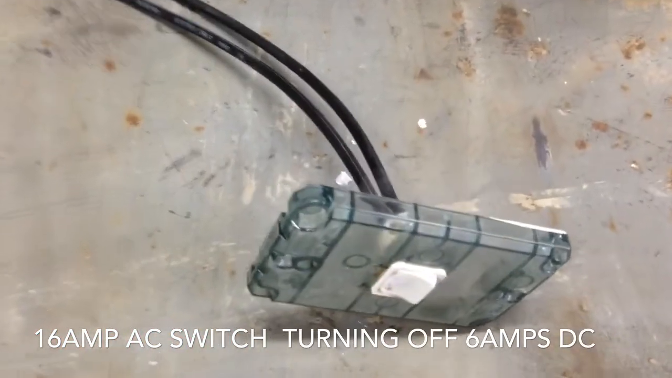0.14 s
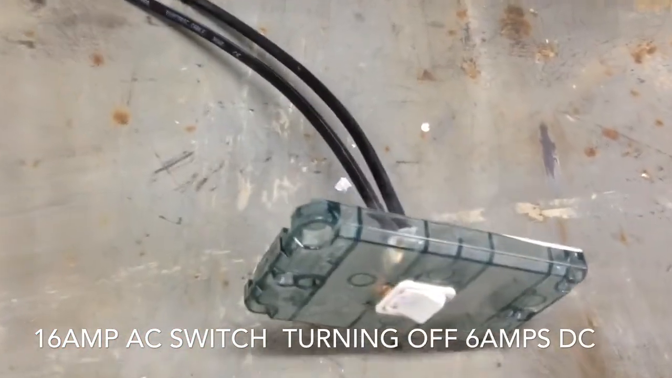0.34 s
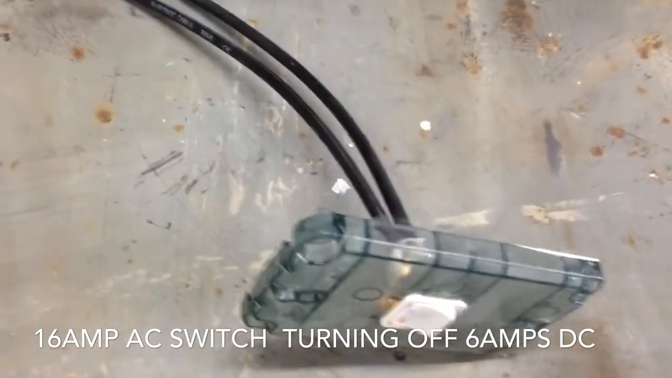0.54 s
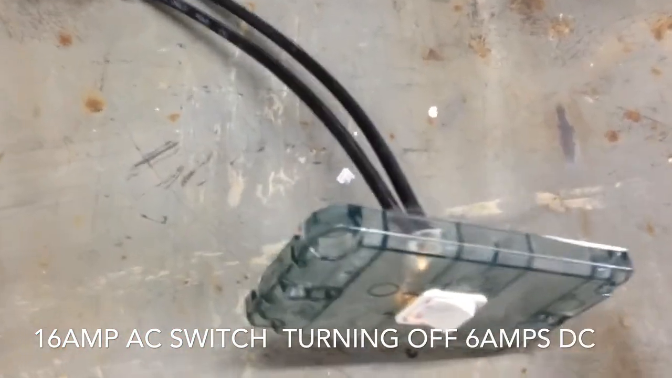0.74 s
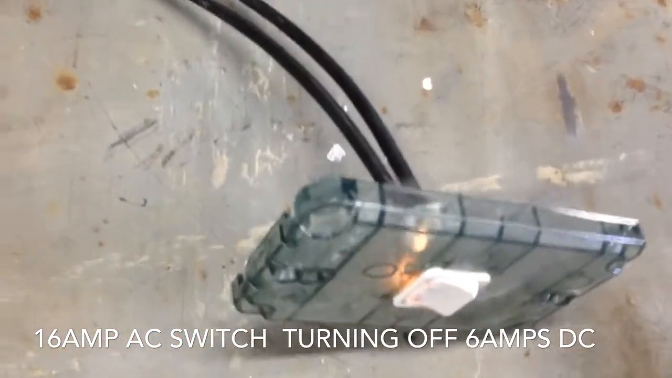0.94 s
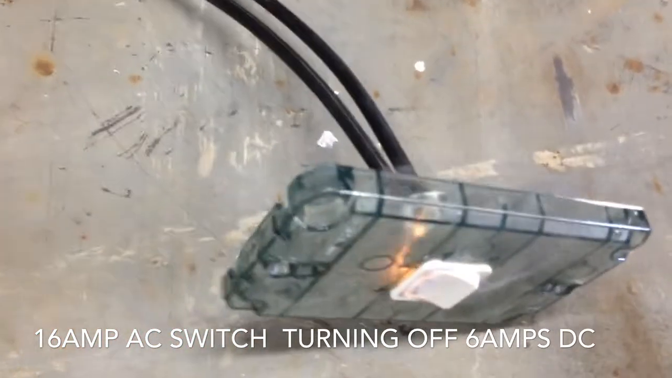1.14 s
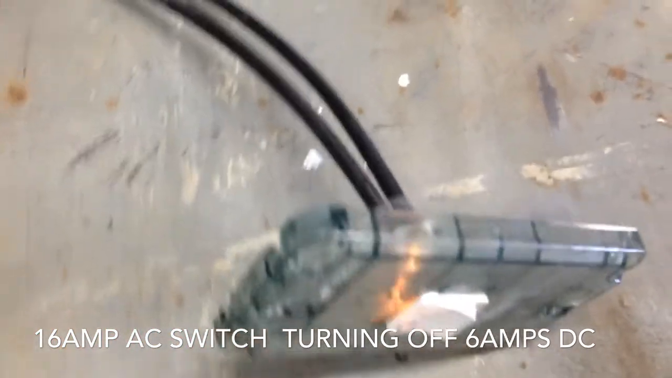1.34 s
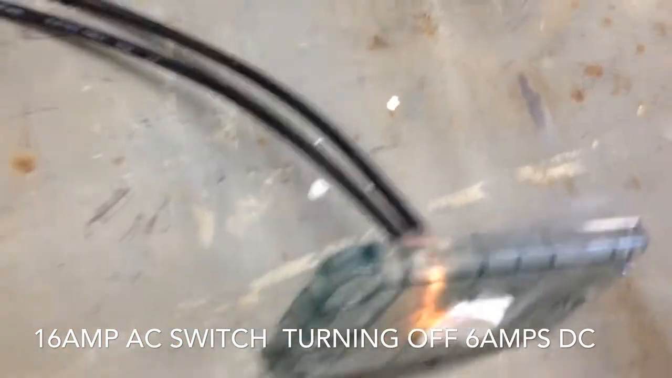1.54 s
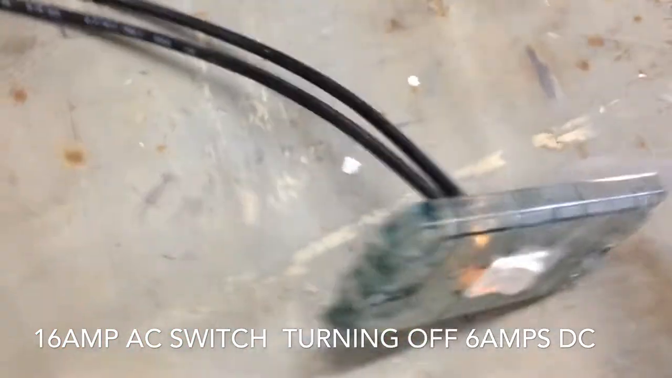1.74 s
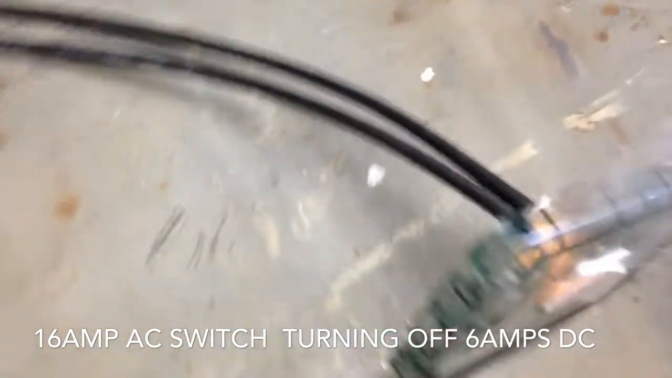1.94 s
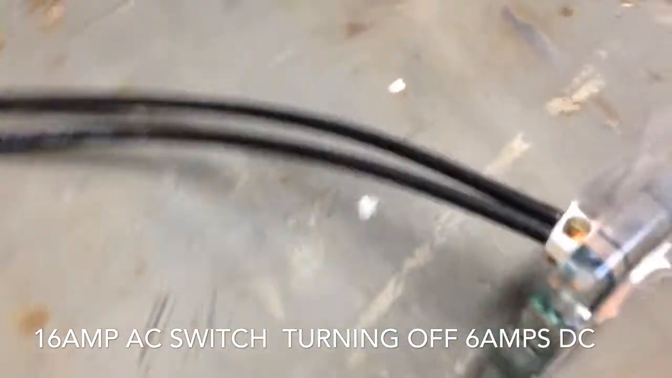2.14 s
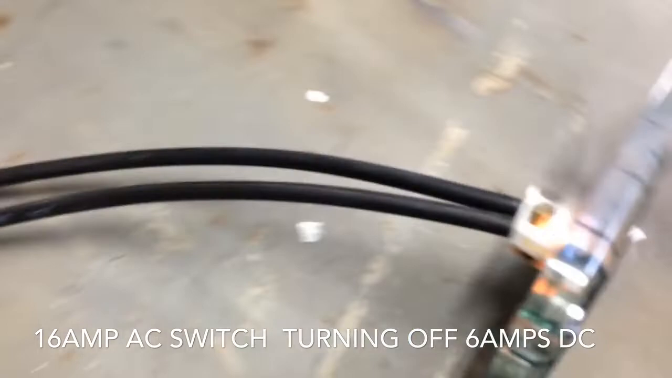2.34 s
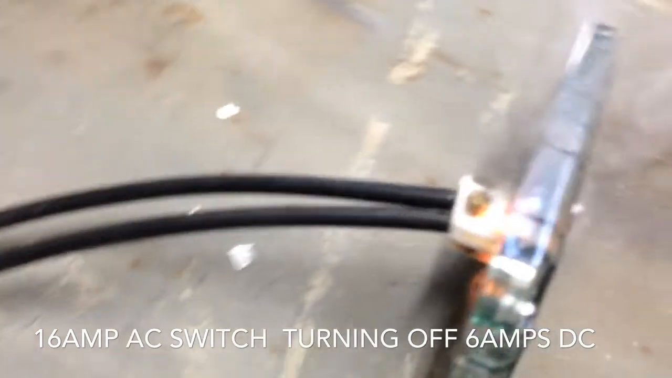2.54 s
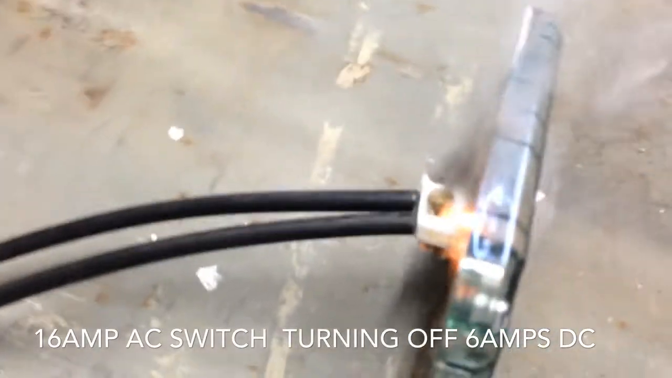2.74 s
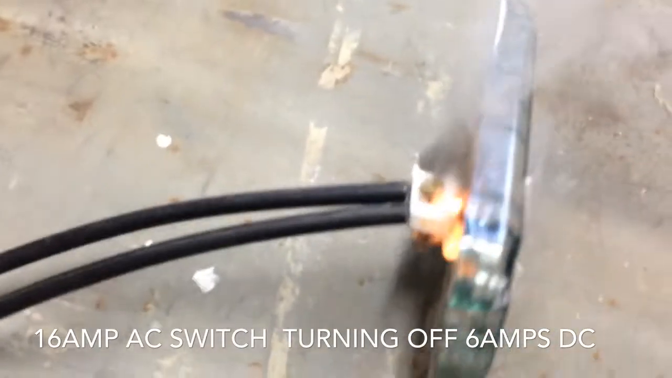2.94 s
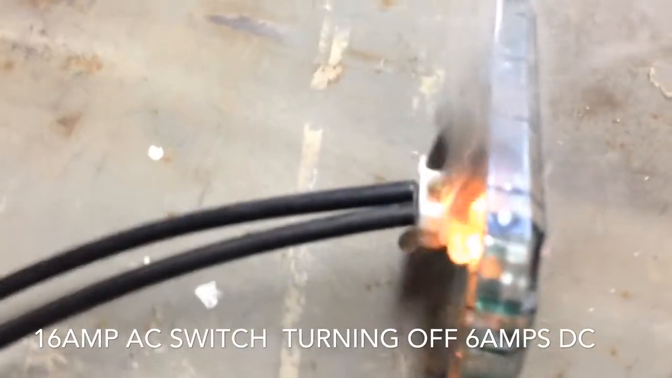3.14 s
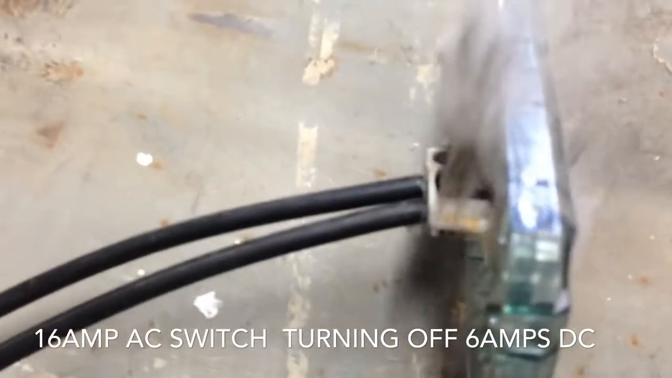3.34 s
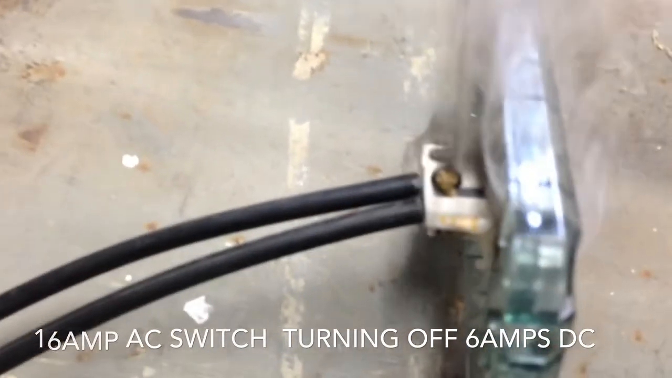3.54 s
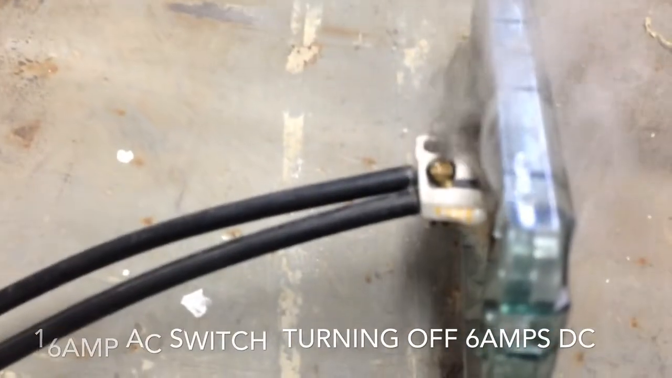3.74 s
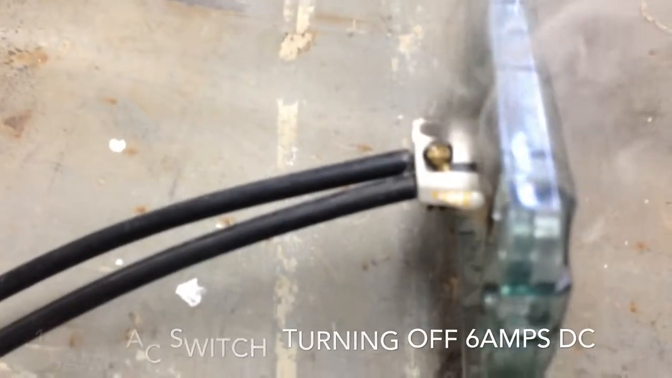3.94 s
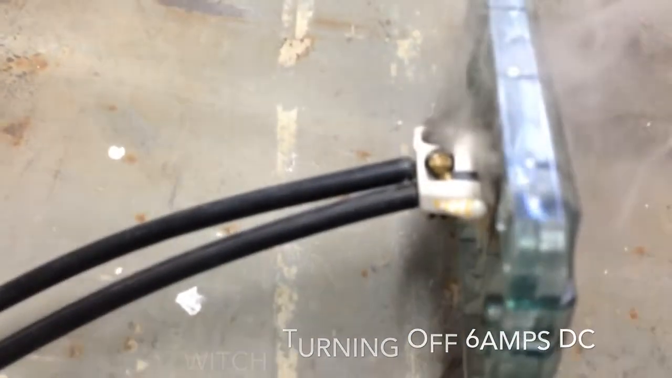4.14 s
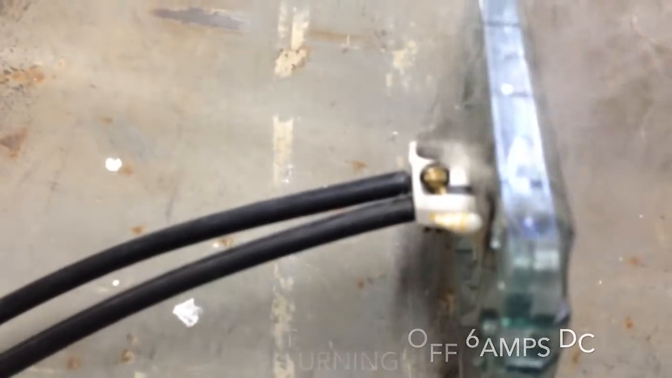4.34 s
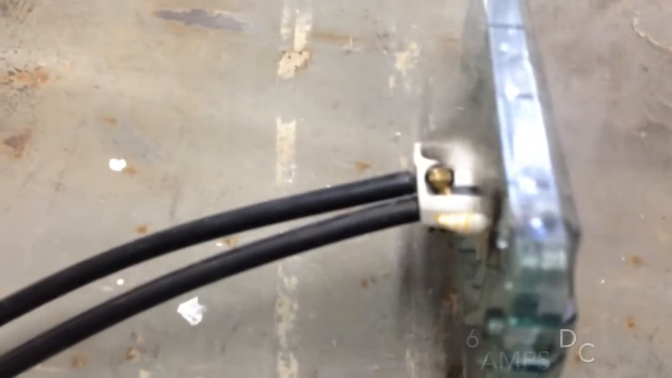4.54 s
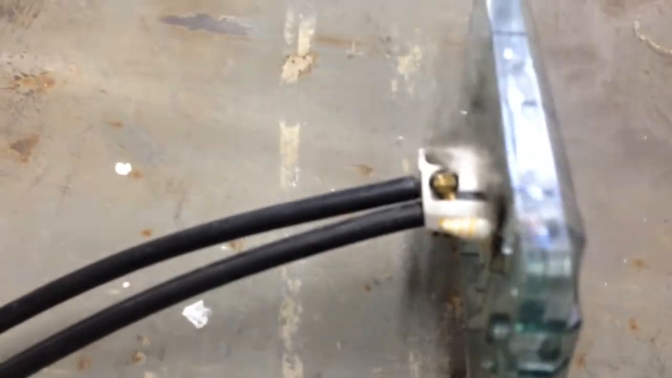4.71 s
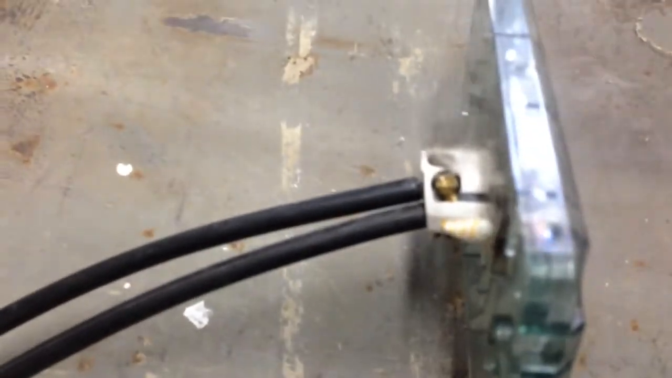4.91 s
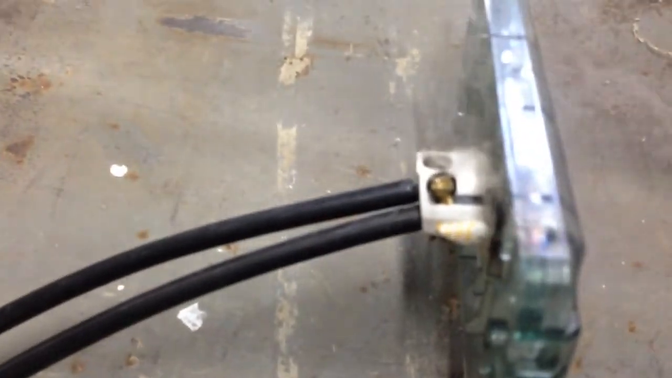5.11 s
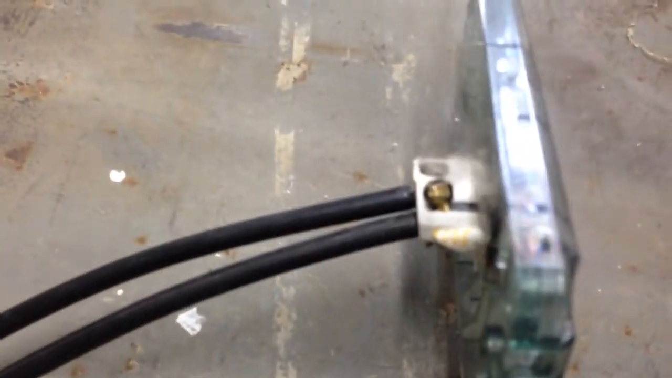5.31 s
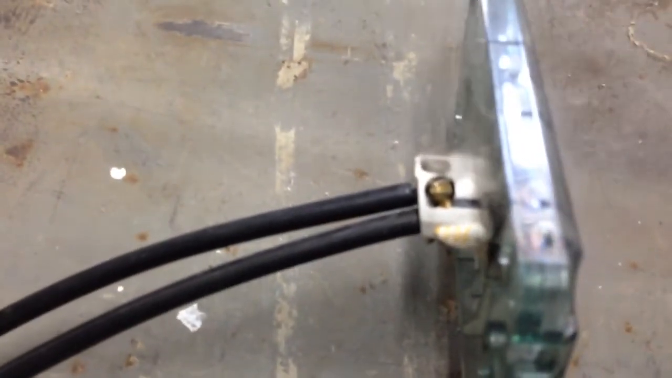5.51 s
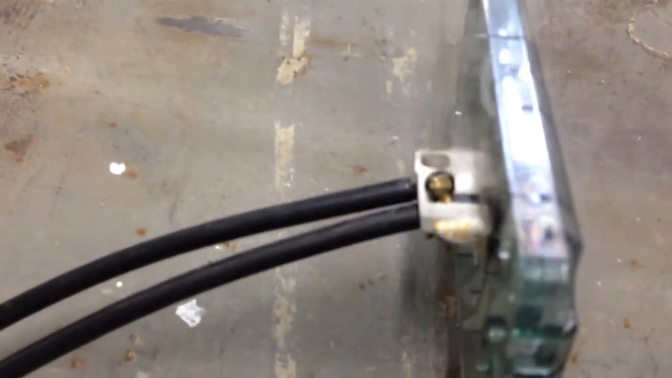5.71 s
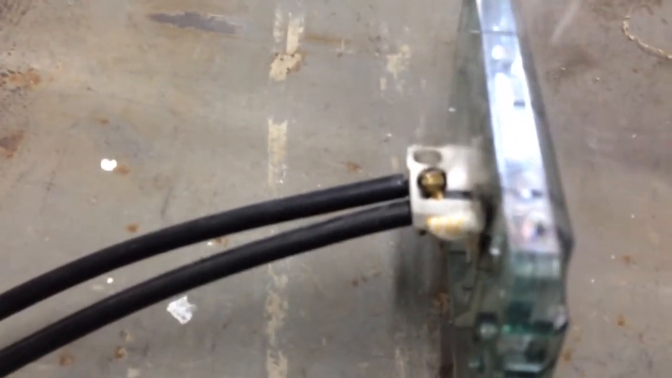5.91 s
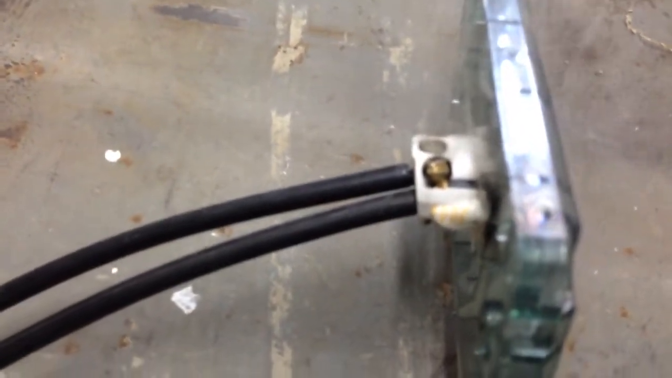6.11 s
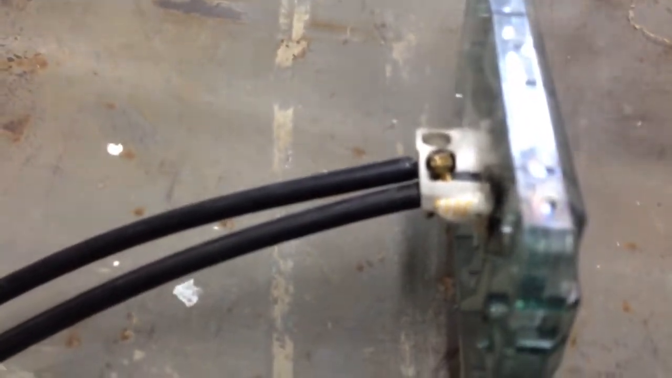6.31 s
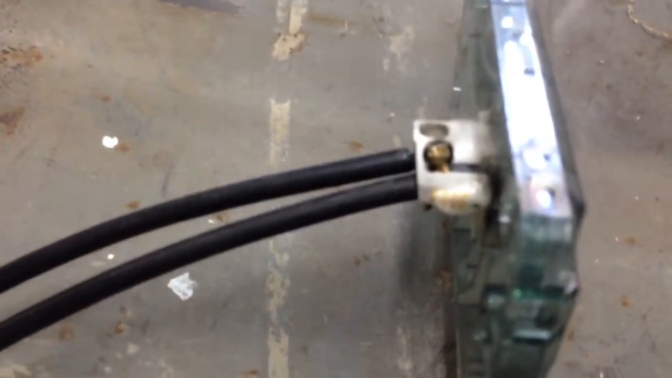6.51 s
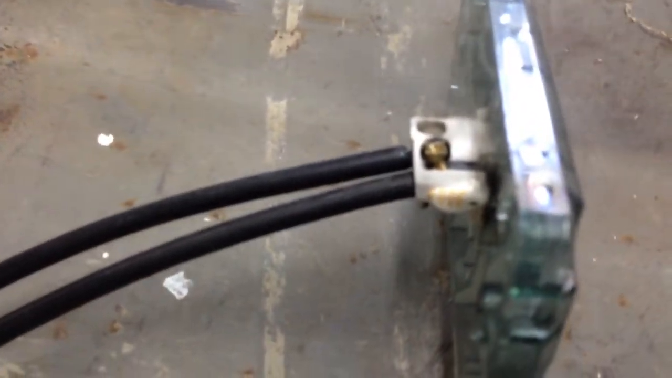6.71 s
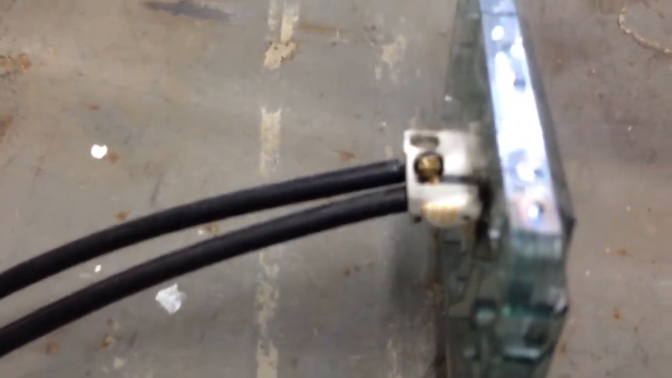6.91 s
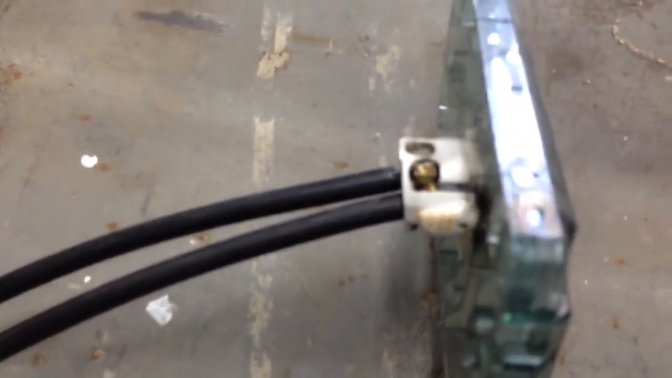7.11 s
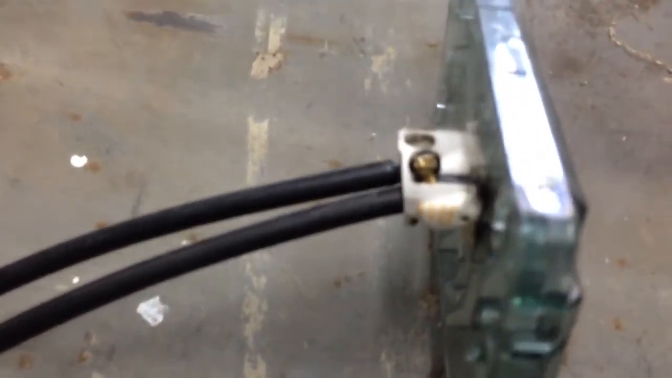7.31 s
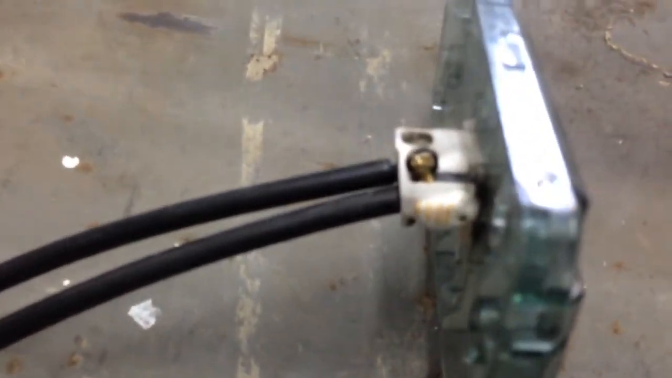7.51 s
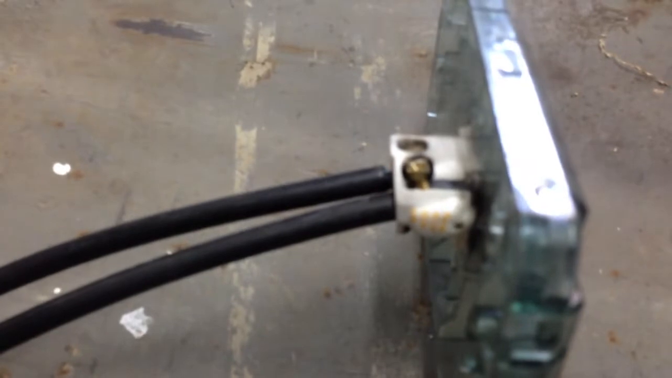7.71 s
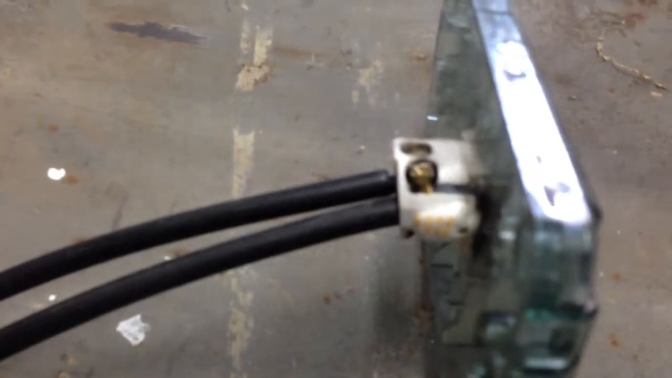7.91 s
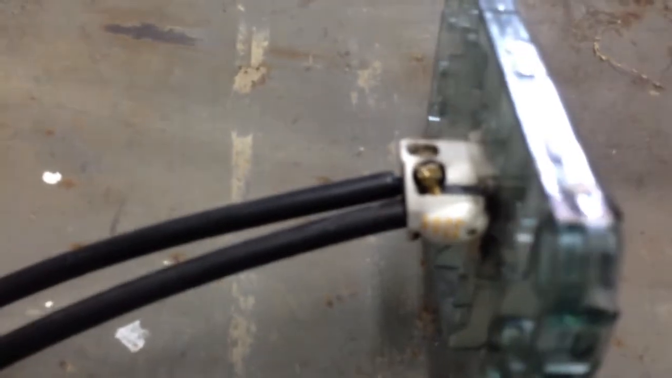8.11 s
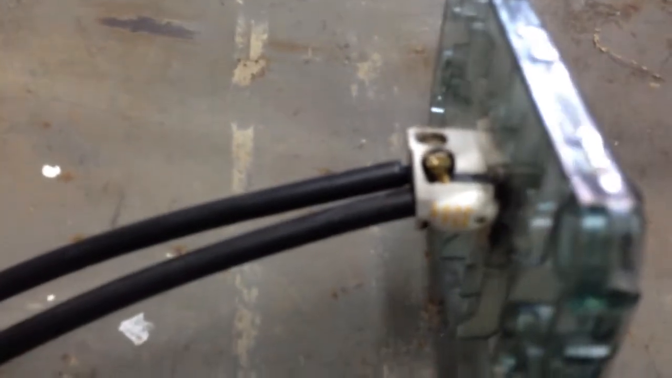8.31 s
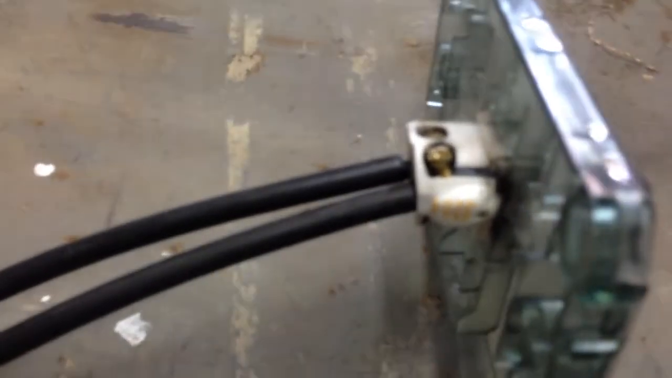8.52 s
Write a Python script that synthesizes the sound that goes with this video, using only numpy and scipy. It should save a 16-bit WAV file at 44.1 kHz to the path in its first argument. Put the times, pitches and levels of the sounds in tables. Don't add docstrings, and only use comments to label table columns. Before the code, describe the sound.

From 0 s a harsh electric arc rasps and sputters inside a hollow plastic switch, close and dry in a workshop. It is loudest in the first fraction of a second, then sinks into uneven sizzling with quick flare-ups, pops and tiny lulls. Around 1.84 s the handheld camera takes a dull, hard bump with a scuff; smaller knocks surround it. From 2 s the tone shifts as the view moves round, with brighter spits of molten metal and strong pops near 3.05 s. At 3.2 s it flutters, tears and ends at 3.26 s in a very loud, short crack. Quiet room hiss and low traffic rumble follow, with isolated ticks at 3.6 and 4.6 s. After a tiny dip at 4.9 s, fine fizzing rises and plastic ticks multiply, sharpest near 6.67 and 7.4 s. A faint deep motor hum swells from 5.5 to 6.9 s. Fizz thins until 8.5 s.

```python
import sys
import numpy as np
from scipy import signal
from scipy.io import wavfile
from scipy.ndimage import uniform_filter1d, minimum_filter1d

SR = 44100
rng = np.random.default_rng(int(sys.argv[2]) if len(sys.argv) > 2 else 0)


def makeup_ratio(level_db):
    decades = np.asarray(level_db, float) / 20
    return 10 ** decades


def wrap_up_sound(samples):
    columns = np.atleast_2d(samples).T
    tamed = np.clip(columns, -1, 1)
    steps = np.round(tamed * 32767).astype(np.int16)
    wavfile.write(sys.argv[1], SR, steps)


N = 377469

# (time [s], level [dB])
ARC = [(0.0, -25.5), (0.12, -27), (0.3, -31), (0.5, -32.5), (0.7, -34), (0.9, -36.5), (1.1, -35),
       (1.3, -40.5), (1.5, -39), (1.7, -42), (1.9, -35.5), (2.1, -36), (2.3, -37.5), (2.5, -41.5),
       (2.7, -37), (2.9, -37.5), (3.1, -36.5), (3.218, -35.5)]
# (frequency [Hz], level [dB])
HOUSING = [
    [(1120, -54), (1900, -24), (2360, -11), (2540, -11), (2750, -3), (3040, -7), (3240, -2), (3600, 0), (3990, -2), (4690, -17), (5280, -22), (5600, -20), (7280, -50), (12300, -120)],
    [(1120, -49), (1900, -19), (2340, -9), (2450, -5), (2600, -2), (2830, -4), (3080, 0), (3550, -1), (3730, -4), (4100, -7), (5600, -21), (7280, -51), (12300, -120)],
]
# (frequency [Hz], level [dB])
SPIT = [(2940, -15.5), (5000, -8.5), (6000, -6.5), (7790, -2), (9210, -3), (11600, -6.5), (14800, -14),
        (15800, -11.5)]
# (frequency [Hz], level [dB])
FIZZ = [(1180, -16.5), (2000, -2), (2600, -12), (2980, 4), (3610, -0.5), (4840, 5.5), (6450, 1), (7300, -1),
        (7800, 6), (8700, 4), (9200, -7.5), (14700, -9.5), (15900, -14)]
# (time [s], share of the way [0-1])
WALK = [(0, 0.02), (.8, 0.3), (1.5, 0.58), (2.1, 1), (3.3, 0.78)]


def evened(x):
    return x / np.sqrt(np.mean(x ** 2) + 1e-20)


def add(mix, s, sound):
    part = mix[round(s * SR):][:len(sound)]
    part += sound[:len(part)]


def curves(rows):
    s, *columns = np.transpose(rows)
    return [np.interp(np.arange(N) / SR, s, c) for c in columns]


def response(points):
    f, db = np.transpose(points)
    hz = np.abs(np.fft.fftfreq(4096, 1 / SR))
    log_gain = np.interp(np.log(hz + 1), np.log(f + 1), np.maximum(db, -80)) * np.log(10) / 20
    phase = -signal.hilbert(log_gain).imag
    h = np.fft.ifft(np.exp(log_gain + 1j * phase)).real[:2048]
    return h / np.linalg.norm(h)


def coloured(x, points):
    return signal.oaconvolve(x, response(points))[:N]


def walked(x, pair):
    turn = np.pi / 2 * np.clip(curves(WALK)[0], 0, 1)
    return np.cos(turn) * coloured(x, pair[0]) + np.sin(turn) * coloured(x, pair[1])


def flicker(s):
    size = max(round(s * SR), 1)
    return evened(uniform_filter1d(uniform_filter1d(rng.standard_normal(N), size), size))


def sparks(per_s, spread_db, hiss):
    size = makeup_ratio(spread_db * np.minimum(rng.exponential(1, N), 3.5)) * rng.choice([-1, 1], N)
    clicks = evened(size * (rng.random(N) < per_s / SR))
    return (clicks + hiss * rng.standard_normal(N)) / np.sqrt(1 + hiss ** 2)


def ring(hz, db, t60):
    t = np.arange(round(t60 * SR) + 1) / SR
    return makeup_ratio(db - 60 * t / t60) * np.sin(2 * np.pi * hz * t)


def burning():
    # (deepest time [s], depth [dB], fading time [s])
    lulls = [(1.119, -7, .06), (1.255, -5, .03), (1.525, -2, 0.027), (1.62, -5, 0.047),
             (1.885, -10.5, 0.068), (1.99, -6, 0.038), (2.225, -4, 0.035), (2.41, -1.5, 0.04),
             (2.89, -4, .03), (2.955, -6, .02)]
    restrike_s = 0.019
    t = np.arange(N) / SR
    strength_db = curves(ARC)[0]
    for s, db, fading in lulls:
        shape = np.minimum(1 + (t - s) / fading, 1 - (t - s) / restrike_s)
        strength_db = strength_db + db * np.clip(shape, 0, 1)
    return strength_db


def flaring(strength_db):
    # (start [s], length [s], level [dB])
    flares = [(0.009, 0.021, -20), (0.299, 0.027, -22.5), (0.341, 0.01, -27), (0.376, 0.0076, -31),
              (0.438, 0.017, -22), (0.535, 0.019, -26), (0.63, 0.025, -26.5), (0.7, 0.031, -25.5),
              (0.759, 0.0093, -25), (0.84, 0.021, -29), (0.882, 0.0096, -28.5), (0.953, 0.0097, -23),
              (0.973, 0.014, -25), (1.038, 0.029, -31), (1.105, 0.0067, -27), (1.126, 0.029, -27.5),
              (1.214, 0.021, -31.5), (1.26, 0.027, -26.5), (1.325, 0.018, -29), (1.35, 0.014, -28.5),
              (1.387, 0.011, -27), (1.454, 0.021, -30.5), (1.487, 0.019, -31), (1.533, 0.036, -27),
              (1.598, 0.018, -31), (1.63, 0.012, -28.5), (1.653, 0.025, -30.5), (1.692, 0.026, -34),
              (1.728, 0.014, -30), (1.811, 0.025, -29), (1.85, 0.012, -31.5), (1.902, 0.012, -22.5),
              (1.947, 0.0095, -25), (2.008, 0.014, -25.5), (2.056, 0.015, -28), (2.078, 0.01, -26.5),
              (2.095, 0.015, -26), (2.141, 0.013, -28), (2.169, 0.021, -30.5), (2.237, 0.0091, -25),
              (2.253, 0.026, -31), (2.293, 0.017, -29), (2.334, 0.022, -29.5), (2.39, 0.011, -28),
              (2.418, 0.04, -31), (2.481, 0.014, -31), (2.504, 0.021, -29), (2.54, 0.021, -30),
              (2.571, 0.0077, -33), (2.593, 0.01, -30), (2.616, 0.01, -33), (2.655, 0.028, -25.5),
              (2.717, 0.014, -28), (2.769, 0.014, -26.5), (2.871, 0.0095, -27.5), (2.902, 0.0091, -27.5),
              (2.935, 0.0098, -31), (2.985, 0.026, -25.5), (3.045, 0.0065, -21), (3.058, 0.0066, -20),
              (0.905, 0.037, -30.5), (1.0, 0.074, -29), (1.431, .045, -33.5), (1.538, .012, -27),
              (2.236, .008, -25.5), (2.97, 0.052, -29), (3.07, .012, -27)]
    edge_s = 0.0086
    t = np.arange(N) / SR
    strength = makeup_ratio(strength_db) * (t < ARC[-1][0])
    for s, length, db in flares:
        near = slice(round(max(s - .01, 0) * SR), round((s + length + .01) * SR))
        inside = np.minimum(t[near] - s, s + length - t[near])
        swell = makeup_ratio(db - 5.0) * np.clip(inside / edge_s + .5, 0, 1)
        strength[near] = np.maximum(strength[near], swell)
    return strength * makeup_ratio(1.7 * flicker(.001) + .5 * flicker(.004))


def stretching():
    # (time [s], level [dB])
    stretch = [(3.218, -40), (3.2195, -24), (3.236, -25.5), (3.239, -20), (3.247, -19), (3.2495, -25),
               (3.2535, -21), (3.257, -27), (3.263, -34), (3.275, -45)]
    t = np.arange(N) / SR
    return makeup_ratio(curves(stretch)[0]) * (t > stretch[0][0]) * (t < stretch[-1][0])


def wandering(x):
    span = round(3.4 * SR)
    z = signal.stft(x[:span], SR, nperseg=512, noverlap=384)[2]
    patches = uniform_filter1d(uniform_filter1d(rng.standard_normal(z.shape), size=2, axis=0), size=24, axis=1)
    z = z * makeup_ratio(2.2 * evened(patches) - 1.4)
    out = signal.istft(z, SR, nperseg=512, noverlap=384)[1][:span]
    return np.pad(out, (0, N - span))


def discharges(strength, stretch):
    # (time [s], peak [dB])
    pops = [(0.0101, -15), (0.0936, -16), (0.1527, -17), (0.2657, -16), (0.2761, -18), (0.3269, -18),
            (0.4403, -19), (0.4488, -19), (0.4687, -20), (0.4755, -22), (0.5609, -20), (0.6036, -19),
            (0.6292, -19), (0.6428, -16), (0.6609, -22), (0.7247, -20), (0.7647, -18), (0.8386, -19),
            (0.8466, -18), (0.8528, -18), (0.8868, -21), (0.9593, -18), (0.9779, -17), (1.0478, -20),
            (1.075, -20), (1.1574, -21), (1.226, -22), (1.3574, -16), (1.3927, -16), (1.5655, -19),
            (1.6123, -21), (1.6583, -20), (1.9038, -15), (1.9153, -20), (1.9224, -21), (1.9282, -20),
            (1.9461, -18), (2.0165, -22), (2.1033, -22), (2.151, -19), (2.2395, -20), (2.3021, -20),
            (2.3382, -22), (2.5755, -21), (2.6567, -21), (2.6657, -20), (2.6758, -19), (2.7216, -17),
            (2.7701, -19), (2.7918, -21), (2.8745, -19), (2.9026, -17), (2.9396, -22), (2.9681, -21),
            (2.9935, -21), (3.006, -19), (3.022, -21), (3.0476, -11), (3.0592, -14), (3.2116, -20)]
    # (time [s], peak [dB])
    tears = [(3.2191, -15), (3.2213, -13), (3.2232, -14), (3.2338, -15), (3.2445, -12), (3.2463, -11),
             (3.2512, -9), (3.2552, -40), (3.2572, -13), (3.2815, -35)]
    t = np.arange(N) / SR
    drive = strength * sparks(per_s=1300, spread_db=1.8, hiss=.75 + 1.3 * np.exp(-t / .7))
    drive = drive + stretch * sparks(per_s=3500, spread_db=1.5, hiss=1.6)
    drive = wandering(drive)
    peak = abs(response(HOUSING[1])).max()
    for s, db in pops + tears:
        at = round(s * SR)
        drive[at - 60:at + 40] *= .5
        add(drive, s, makeup_ratio([db - 1.0]) / peak)
    return drive


def metal_share(strength_db):
    # (start [s], length [s], rise [dB])
    melts = [(1.63, 0.048, 18), (2.073, 0.23, 14.5), (2.337, 0.07, 20), (2.59, 0.404, 6.5),
             (3.05, 0.14, 12.5)]
    t = np.arange(N) / SR
    spit_db = -18.5 + (np.minimum(strength_db, -33) + 36.5)
    for s, length, db in melts:
        spit_db = spit_db + db * np.clip(np.minimum(t - s, s + length - t) / 0.028, 0, 1)
    return spit_db


def glanced(x):
    # (time [s], spacing [Hz], depth [0-1])
    glance = [(0, 1825, 0.8), (.5, 1760, 0.8), (1.0, 1703, 0.8), (1.5, 1690, .8), (1.9, 1620, .7),
              (2.1, 1620, 0), (3.3, 1620, 0.06)]
    width_hz, from_hz, patchy = 137, 4600, .45
    span = round(3.4 * SR)
    hz, t, z = signal.stft(x[:span], SR, nperseg=512, noverlap=384)
    s, spacing, depth = np.transpose(glance)
    spacing, depth = np.interp(t, s, spacing), np.clip(np.interp(t, s, depth), 0, 1)
    off = (hz[:, None] / spacing + .5) % 1 * spacing - spacing / 2
    patches = uniform_filter1d(uniform_filter1d(rng.standard_normal(z.shape), size=9, axis=0), size=50, axis=1)
    notch = np.clip(depth - patchy * (.3 + evened(patches)), 0, .95)
    notch = notch * np.exp(-(off / width_hz) ** 2) * (hz[:, None] > from_hz)
    out = signal.istft(z * (1 - notch), SR, nperseg=512, noverlap=384)[1][:span]
    return np.pad(out, (0, N - span))


def shadowed(x):
    # (start [s], end [s], frequency [Hz], width [Hz], depth [0-1])
    shadows = [(0, 1.7, 830, 90, .7), (0, 1.7, 1140, 160, .8), (.3, 1.8, 1560, 100, .5),
               (0, 1.5, 1820, 100, .5), (0, .9, 2080, 120, .6), (0, .5, 2583, 150, .6),
               (.5, 1.5, 4306, 150, .5), (.9, 1.85, 5150, 260, .85), (1.92, 2.03, 5400, 600, .95),
               (1.7, 1.8, 8700, 300, .85), (2.4, 3.1, 1950, 150, .75), (2.45, 2.75, 6000, 700, .7),
               (0, 3.3, 630, 120, .4), (.5, 2, 2400, 300, .3)]
    fade_s = .1
    out = x.copy()
    for start, end, hz, width, depth in shadows:
        a, b = round(max(start - fade_s, 0) * SR), round((end + fade_s) * SR)
        t = np.arange(a, b) / SR
        share = min(depth, 1) * np.clip(np.minimum(t - start, end - t) / fade_s + 1, 0, 1)
        band = signal.lfilter(*signal.iirpeak(hz, hz / width, fs=SR), out[a:b])
        add(out, a / SR, -share * band)
    return out


def arc():
    # (frequency [Hz], level [dB])
    gas = [
        [(3120, -14), (5300, -34), (5840, -2.5), (6330, -6.5), (6760, 1.5), (7320, -4), (7620, 5.5), (8020, 3.5), (8950, 4), (9580, -5), (10500, -14.5), (13600, -79), (22000, -120)],
        [(3120, -4.5), (5300, -24), (5870, -6.5), (7710, 3), (9420, -11.5), (10700, -8.5), (12200, -23), (15500, -42)],
    ]
    # (frequency [Hz], level [dB])
    flame = [
        [(120, -61), (200, -21.5), (740, -13), (811, -0.5), (995, -6.5), (1840, -4), (2300, -53), (2990, -24), (5060, -120)],
        [(120, -36), (200, -5), (258, -28), (492, 5), (836, -6), (995, 2.5), (1530, 0.5), (1910, 6.5), (2300, 3), (2990, -48), (5060, -120)],
    ]
    # (delay [s], level [dB])
    floor_echo = [(.00295, -5), (.0059, -13)]
    snap_s, snap_db = 3.255, -.2
    strength_db = burning()
    gas_db = -5.5 - 3.5 * curves(WALK)[0]
    flame_db = -14.5 - 0.026 * (strength_db + 32)
    strength, stretch = flaring(strength_db), stretching()
    drive = discharges(strength, stretch)
    gusty = uniform_filter1d(strength + stretch, round(0.0051 * SR)) * rng.standard_normal(N)
    spits = (strength + stretch) * makeup_ratio(2.0 * flicker(.02)) * sparks(per_s=900, spread_db=3.0, hiss=1.5)

    high = walked(drive, HOUSING)
    high = high + walked((0.52 * drive + 0.93 * gusty) * makeup_ratio(gas_db - 5.5), gas)
    high = high + coloured(spits * makeup_ratio(metal_share(strength_db) - 4.5), SPIT)
    high = glanced(high)
    low = walked((0.87 * drive + 0.92 * gusty) * makeup_ratio(flame_db - 7.0), flame)

    snap = response(HOUSING[1]) + 0.2 * response(gas[1]) + .004 * response(SPIT)
    snap = snap * makeup_ratio(-60 * np.arange(len(snap)) / SR / .008)
    add(high, snap_s, -makeup_ratio(snap_db) * snap / abs(snap).max())
    add(low, snap_s, -0.5 * response(flame[1]))

    out = high + low
    for delay, db in floor_echo:
        add(out, delay, makeup_ratio(db) * low)
    return signal.lfilter(*signal.butter(2, 110, "high", fs=SR), shadowed(out))


def workshop():
    # (frequency [Hz], level [dB])
    air_tone = [(1120, -19), (1900, -11.5), (2230, -7), (2590, 0.5), (3220, -4), (3740, -6), (6350, -10),
                (7250, -13.5), (9360, -13), (12400, -12), (13300, -9.5), (14700, -16), (15600, -8)]
    # (frequency [Hz], level [dB])
    rumble_tone = [(12, -59), (20, -19), (41, -5), (81, 3), (101, -8.5), (130, -13.5), (200, -14.5),
                   (260, -40), (440, -120)]
    # (frequency [Hz], level [dB])
    street_tone = [(65, -40.5), (110, 0), (130, -2.5), (224, -5), (364, -10.5), (539, -13), (628, -15),
                   (1050, -13), (1470, -18.5), (2300, -27), (2990, -49), (5060, -120)]
    # (time [s], level [dB])
    air_level = [(0, -63), (1.9, -63), (3.2, -60), (3.5, -61), (4.4, -63.5), (4.96, -62), (5.15, -59),
                 (6.4, -61), (7.9, -61.5), (8.56, -63.5)]
    # (time [s], level [dB])
    traffic = [(0, -82), (.4, -67), (1, -74), (2.1, -63.5), (3, -63.5), (3.93, -68.5), (4.41, -63),
               (4.96, -63.5), (5.2, -61.5), (6.4, -60.5), (7.0, -62.5), (7.44, -60), (8.56, -59)]
    t = np.arange(N) / SR
    air_db, traffic_db = curves(air_level)[0], curves(traffic)[0]
    air = coloured(sparks(per_s=350, spread_db=5.0, hiss=2.06), air_tone)
    air = air * makeup_ratio(air_db + 5.5 + 1.5 * flicker(0.022))

    rumble = coloured(rng.standard_normal(N), rumble_tone)
    rumble = rumble * makeup_ratio(traffic_db + 2.1 * flicker(0.03))
    street_db = -63.5 + 1.12 * (traffic_db - traffic_db.max())
    street = coloured(rng.standard_normal(N), street_tone)
    street = street * makeup_ratio(street_db + 3.5 + 1.8 * flicker(0.019))

    fizz_start_s, fizz_rise_s, cool_db_per_s = 4.8, 1.5, -4.5
    onset = np.clip((t - fizz_start_s) / fizz_rise_s, 0, 1)
    fizz_db = -55 + cool_db_per_s * np.maximum(t - fizz_start_s - fizz_rise_s, 0)
    fizz = coloured(sparks(per_s=500, spread_db=3.5, hiss=1.7), FIZZ)
    fizz = fizz * onset * makeup_ratio(fizz_db + 1.5 * flicker(.008))
    return air + fizz + rumble + street


def knocks():
    # (time [s], peak [dB], pitch [Hz], ring time t60 [s])
    knock_table = [(0.904, -43.5, 242, 0.025), (1.45, -44.5, 248, 0.093), (1.66, -36.5, 278, 0.032),
                   (1.8444, -28, 125, 0.055), (2.211, -39.5, 152, 0.052), (2.52, -45, 560, .05),
                   (2.558, -43.5, 577, 0.067), (2.61, -45, 580, 0.044), (2.795, -41.5, 560, 0.056),
                   (2.882, -49, 187, 0.4), (4.205, -49, 193, 0.25), (4.266, -46.5, 189, 0.2),
                   (4.566, -67, 836, .15), (7.878, -41.5, 990, 0.018), (7.877, -46, 500, .02)]
    # (time [s], level [dB], pitch [Hz], width [Hz], length [s])
    scuffs = [(1.442, -54.5, 264, 200, 0.3), (1.84, -41.5, 260, 300, 0.059), (1.839, -46, 670, 540, 0.033),
              (4.1, -66, 440, 150, 0.15), (3.055, -42, 970, 1200, 0.024), (3.692, -58, 1100, 1800, .01),
              (2.051, -54.5, 460, 300, 0.69), (3.252, -46.5, 300, 460, 0.025),
              (3.256, -44.5, 1150, 1000, 0.039), (4.557, -62, 820, 160, 0.13), (4.819, -66, 810, 180, .07),
              (7.15, -60.5, 480, 900, 0.4)]
    # (pitch [Hz], peak [dB], ring time t60 [s])
    bump = [(189, -27, 0.063), (320, -13, 0.017), (560, -38, 0.0072), (900, -44, 0.008)]
    bump_s, push_db, push_rise_s = 1.8377, -23, .009
    out = np.zeros(N)
    for s, db, hz, t60 in knock_table:
        add(out, s, ring(hz, db, t60))
        add(out, s + 0.0045, ring(1.61 * hz, db - 7.5, 0.31 * t60))
    for s, db, hz, width, length in scuffs:
        rub = signal.oaconvolve(rng.standard_normal(SR // 2), ring(hz, 0, 3.3 / width))[:round(length * SR)]
        age = np.linspace(0, 1, len(rub))
        add(out, s, makeup_ratio(db) * evened(rub) * np.minimum(age / 0.11, 1) * (1 - age) ** 0.65)
    for mode in bump:
        add(out, bump_s, -ring(*mode))
    push = makeup_ratio(np.linspace(push_db - 32, push_db, round(push_rise_s * SR)))
    add(out, bump_s - push_rise_s, np.append(push, push[-1] * np.linspace(1, 0, 30)))
    return signal.lfilter(*signal.butter(2, 80, "high", fs=SR), uniform_filter1d(out, size=13))


def droplets():
    # (time [s], peak [dB])
    bursts = [(1.3923, -29), (1.539, -37), (1.6418, -31), (1.9022, -51), (2.0349, -35), (2.0638, -29),
              (2.0916, -23), (2.2065, -21), (2.249, -21), (2.345, -29), (2.3557, -33), (2.5747, -31),
              (2.7747, -28), (2.846, -28), (2.865, -20), (2.9245, -21), (3.0461, -39), (4.6628, -35),
              (6.531, -41), (7.2974, -44), (7.4039, -29)]
    drive, age = np.zeros(N), np.arange(round(0.016 * SR)) / SR
    fizz = rng.standard_normal((len(bursts), len(age))) * makeup_ratio(-14.0 - 60 * age / 0.0091)
    peak = abs(response(SPIT)).max()
    for (s, db), tail in zip(bursts, fizz):
        add(drive, s, makeup_ratio([db - 21.0]) / peak)
        add(drive, s, makeup_ratio(db + 3.0) * tail / peak)
    return coloured(drive, SPIT)


def ticks():
    # (time [s], peak [dB], ring pitch [Hz], bright edge [dB])
    cracks = [(3.626, -27, 2680, -17.5), (4.57, -24.5, 2680, -30), (5.1887, -24, 2580, -17),
              (5.222, -28.5, 2800, -19), (5.2544, -34, 2600, -12), (5.302, -28, 2570, -28),
              (5.542, -26, 2380, -26), (5.631, -24, 2540, -22), (5.682, -24, 2860, -27),
              (6.1482, -26.5, 4600, -11), (6.3106, -25, 2520, -19), (6.358, -25.5, 2930, -15),
              (6.5868, -25, 2920, -17), (6.649, -28, 3000, -22), (6.665, -14, 2860, -25),
              (6.7176, -18.5, 2540, -32), (6.776, -26.5, 2570, -29), (6.809, -23, 2850, -23),
              (7.1503, -37, 4810, -23), (7.2172, -23, 2980, -22), (7.277, -25.5, 2530, -27),
              (7.4033, -16, 5100, -20), (7.7823, -36, 2990, -19), (8.019, -36, 5180, -21),
              (8.1116, -30, 2670, -21),]
    out, edge, body = np.zeros(N), response(SPIT)[:200], response(HOUSING[1])[:300]
    for s, db, hz, edge_db in cracks:
        add(out, s + .0006, ring(hz, db - 17.0, 0.009))
        add(out, s + 0.00068, makeup_ratio(db - 14.0) * body / abs(body).max())
        add(out, s + .0006, makeup_ratio(db + edge_db + 7.0) * edge / abs(edge).max())
    return out


def specks():
    # (time [s], peak [dB])
    bursts = [(3.8229, -48), (3.8882, -47), (4.6625, -34), (5.1748, -39), (5.2536, -48), (5.6233, -43),
              (5.8059, -45), (5.9196, -43), (5.968, -44), (6.2908, -45), (6.3796, -39), (6.5302, -40),
              (6.6519, -43), (7.298, -42), (7.4027, -28), (7.8637, -39)]
    out, click = np.zeros(N), np.diff(response(SPIT)[:120], 3)
    for s, db in bursts:
        add(out, s + .001, makeup_ratio(db + 4.5) * click / abs(click).max())
    return out


def flakes():
    # (time [s], peak [dB])
    bursts = [(5.0262, -45), (5.109, -50), (5.1894, -46), (5.2551, -38.5), (5.9208, -44), (6.0375, -40),
              (6.073, -41), (6.2524, -46), (6.3399, -38.5), (6.3858, -41), (6.4241, -48), (6.5313, -40),
              (6.577, -44.5), (6.6165, -41), (6.6654, -44), (6.7464, -42), (6.8095, -41), (6.8203, -42.5),
              (6.8712, -37.5), (6.907, -42), (6.9866, -42), (7.011, -44), (7.0538, -52), (7.0738, -49),
              (7.0928, -43), (7.1182, -40), (7.1516, -41), (7.1739, -40), (7.1985, -41), (7.237, -39),
              (7.2987, -42), (7.3266, -45), (7.3426, -41), (7.4039, -36), (7.4413, -45), (7.4661, -44),
              (7.4903, -40.5), (7.5422, -46), (7.5896, -41), (7.657, -39), (7.7124, -44), (7.76, -48),
              (7.7829, -40), (7.8078, -43), (7.8648, -36.5), (7.9071, -42), (7.9585, -43), (7.99, -39.5),
              (8.0198, -39.5), (8.0913, -43), (8.1139, -46), (8.1238, -43), (8.1742, -43), (8.1879, -42),
              (8.2547, -40), (8.2778, -40), (8.3867, -50), (8.433, -47), (8.4853, -51), (8.546, -43)]
    drive, age = np.zeros(N), np.arange(round(0.007 * SR)) / SR
    fizz = rng.standard_normal((len(bursts), len(age))) * makeup_ratio(-19 - 60 * age / 0.009)
    for (s, db), tail in zip(bursts, fizz):
        add(drive, s, makeup_ratio(db + 11.0) * np.append(1, tail))
    return coloured(drive, FIZZ) + 0.18 * coloured(drive, SPIT)


def hum():
    start_s, peak_s, end_s, fade_s = 5.47, 6.3, 6.93, 0.11
    full_hz, spin_up_hz, spin_up_s = 75, 4.2, 0.063
    t = np.arange(N) / SR
    hz = full_hz - spin_up_hz * np.exp(-np.maximum(t - start_s, 0) / spin_up_s)
    turns = 2 * np.pi * np.cumsum(hz) / SR
    on = np.clip(np.minimum(t - start_s, end_s - t) / fade_s, 0, 1)
    db = -53 - 6 * abs(t - peak_s)
    third_db = -65.5 + 1.1 * flicker(.06)
    return np.sqrt(2) * on * (makeup_ratio(db) * np.sin(turns) + makeup_ratio(third_db) * np.sin(3 * turns))


def surroundings(x):
    t60, room_db = .07, -18
    t = np.arange(SR // 5) / SR
    tail = rng.standard_normal(len(t)) * makeup_ratio(-60 * t / t60) * (t > .002)
    h = makeup_ratio(room_db) * tail / np.linalg.norm(tail)
    add(h, 0, np.ones(1))
    return signal.oaconvolve(x, h / np.linalg.norm(h))[:N]


def scene():
    switch = surroundings(arc() + droplets() + ticks() + flakes())
    return (switch + workshop() + knocks() + specks() + hum())[None]


def starved(x):
    starved_hz = 9400
    hz, _, z = signal.stft(x, SR, nperseg=1024)
    near = uniform_filter1d(uniform_filter1d(abs(z) ** 2, size=4, axis=1), size=6, axis=2)
    near_db = 10 * np.log10(abs(near) + 1e-20)
    chance = uniform_filter1d(uniform_filter1d(rng.standard_normal(z.shape), size=5, axis=1), size=7, axis=2)
    limit_db = uniform_filter1d(near_db, size=30, axis=1) - 3.3 + 1.3 * evened(chance)
    limit_db = limit_db - 3.2 * (hz[:, None] < starved_hz)
    treble = abs(near[:, hz > starved_hz]).mean(1, keepdims=True)
    steady = treble < 3.5 * minimum_filter1d(treble, size=13, axis=2) + 1e-20
    weak = (near_db < limit_db) & (hz[:, None] > starved_hz / 2) & steady
    return signal.istft(z * ~weak, SR, nperseg=1024)[1][:, :N]


def top_cut(x):
    return signal.sosfilt(signal.butter(12, 16190, fs=SR, output="sos"), x)


def record(dry):
    change_s, half_s = 4.905, .029
    dip = np.clip(abs(np.arange(N) / SR - change_s) / half_s, .03, 1)
    mix = np.clip(starved(dry) * dip, -.98, .98)
    low_pass = signal.firwin(511, 15300, window=("kaiser", 8), fs=SR)
    mix = signal.oaconvolve(mix, low_pass[None], "same")
    return top_cut(mix)


dry = scene()
out = record(dry)
wrap_up_sound(out)
```